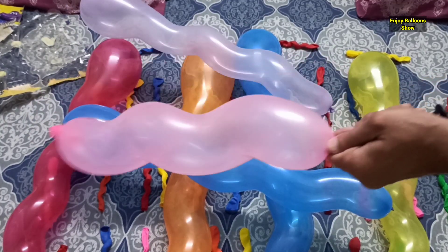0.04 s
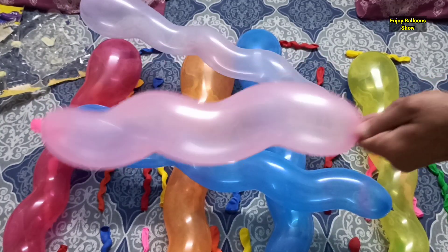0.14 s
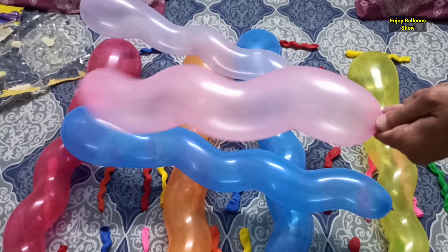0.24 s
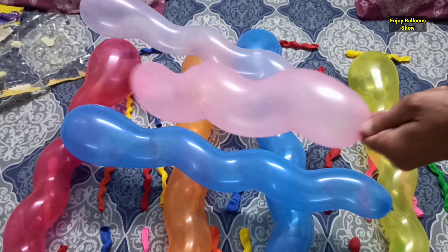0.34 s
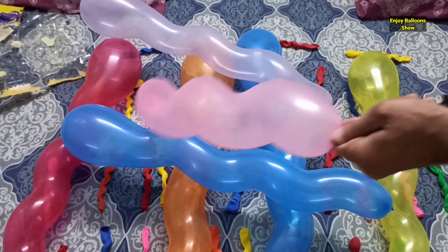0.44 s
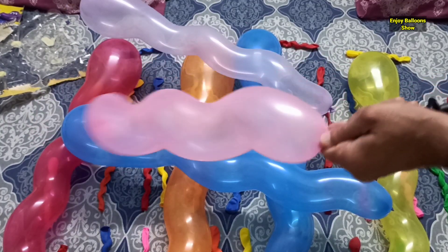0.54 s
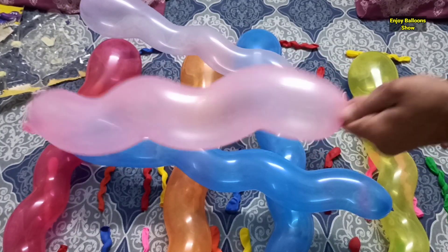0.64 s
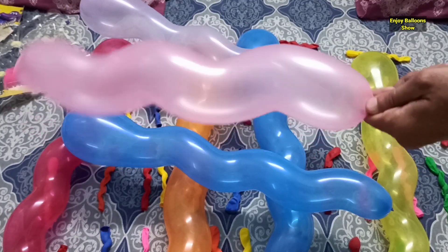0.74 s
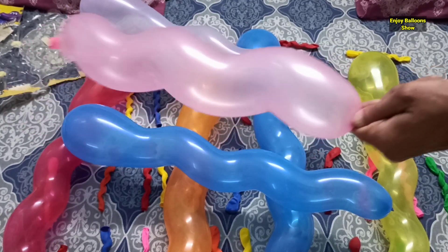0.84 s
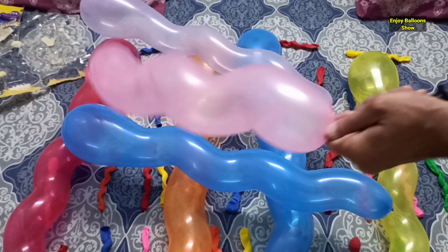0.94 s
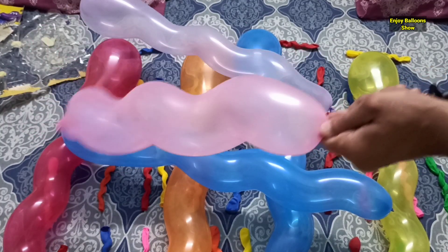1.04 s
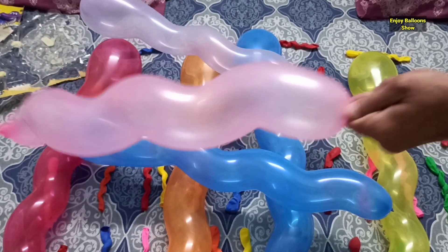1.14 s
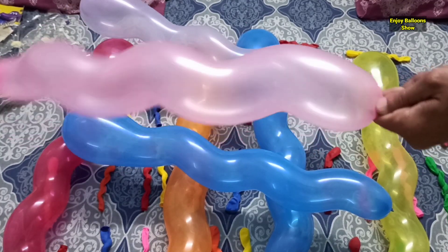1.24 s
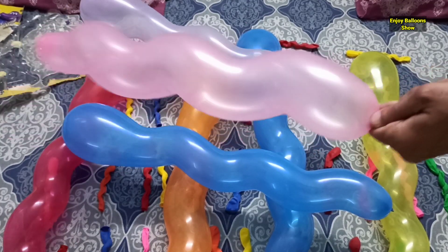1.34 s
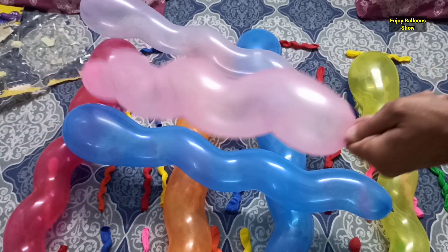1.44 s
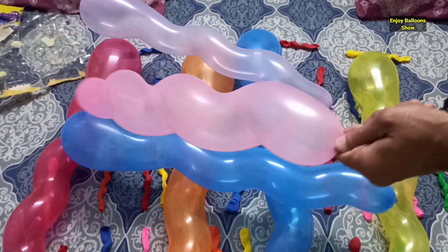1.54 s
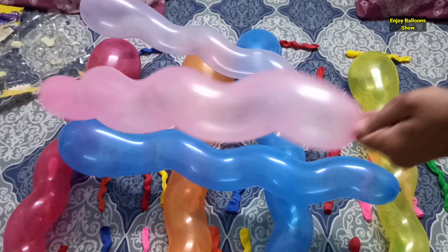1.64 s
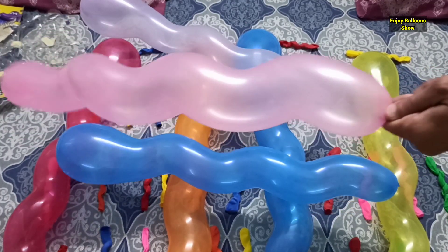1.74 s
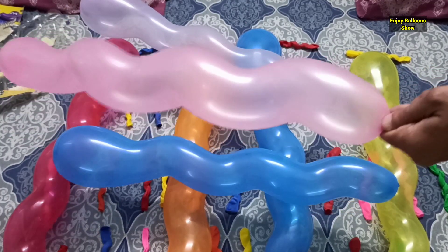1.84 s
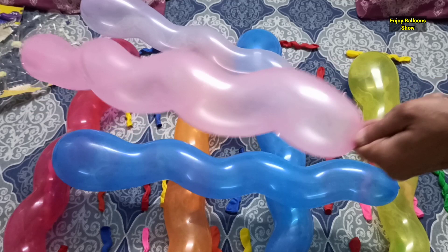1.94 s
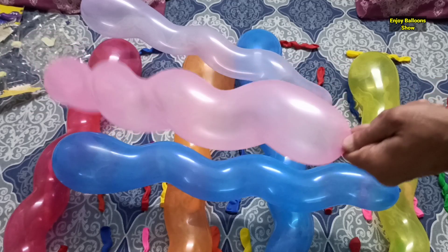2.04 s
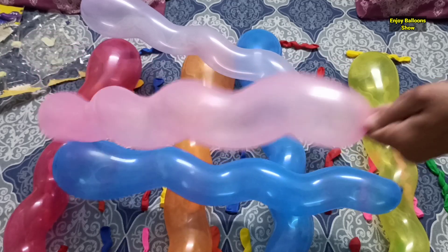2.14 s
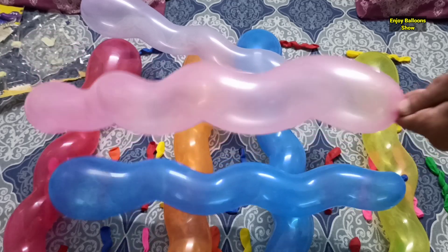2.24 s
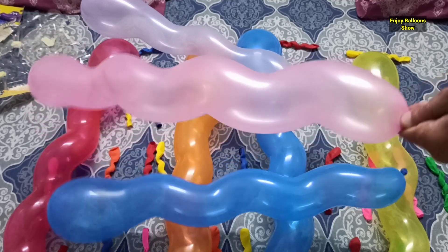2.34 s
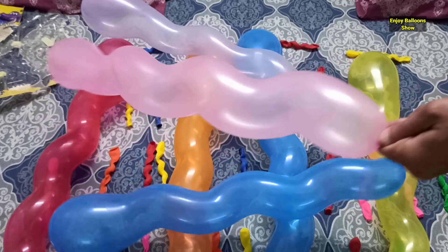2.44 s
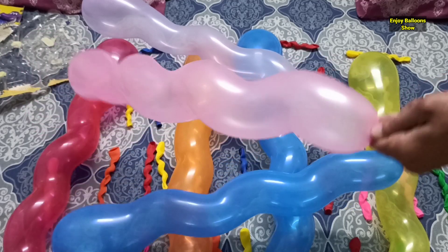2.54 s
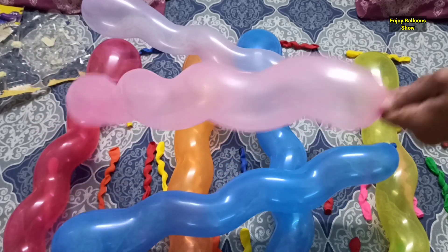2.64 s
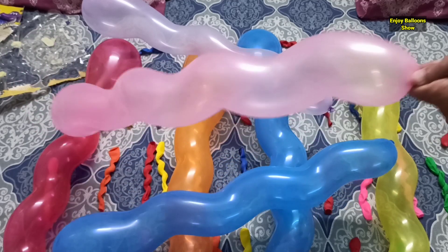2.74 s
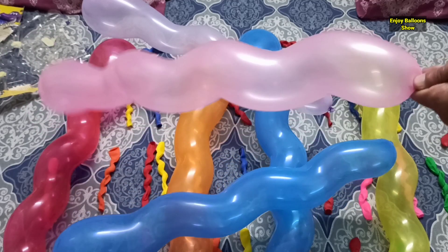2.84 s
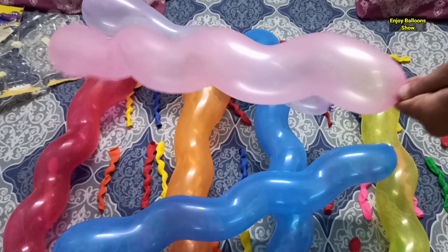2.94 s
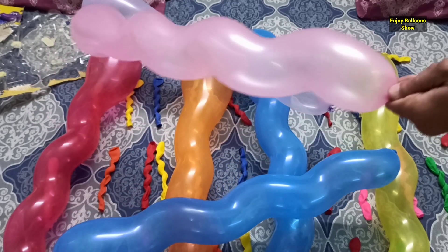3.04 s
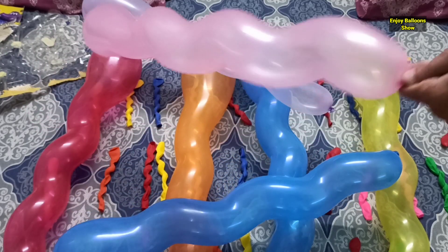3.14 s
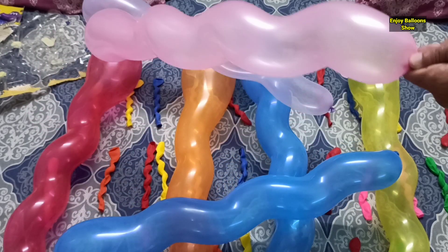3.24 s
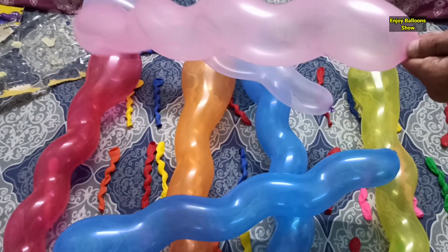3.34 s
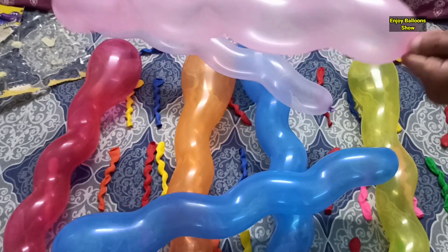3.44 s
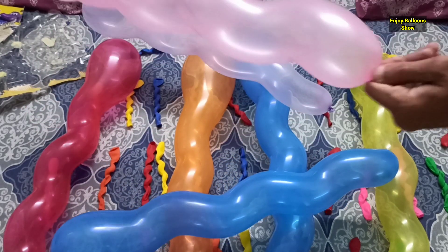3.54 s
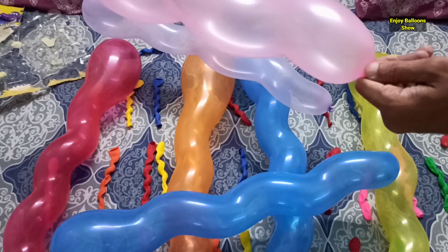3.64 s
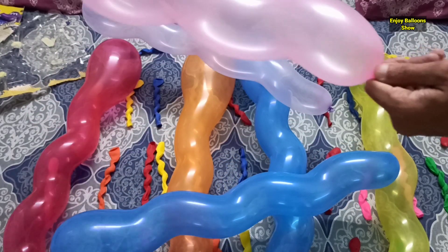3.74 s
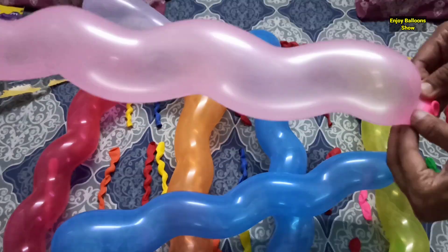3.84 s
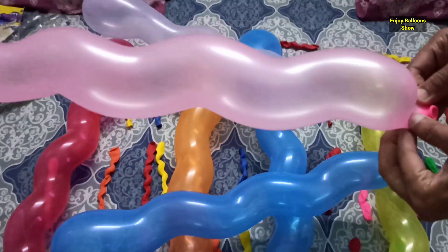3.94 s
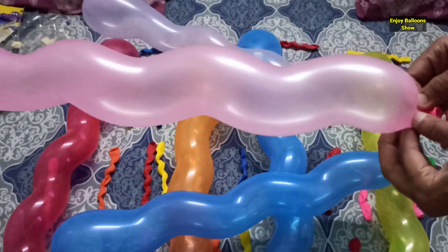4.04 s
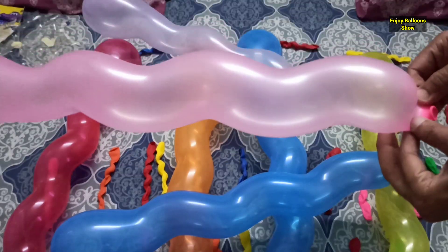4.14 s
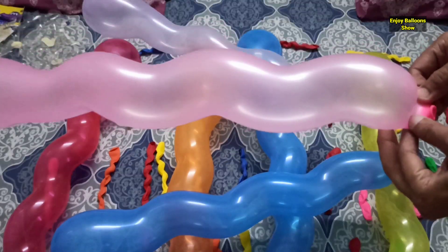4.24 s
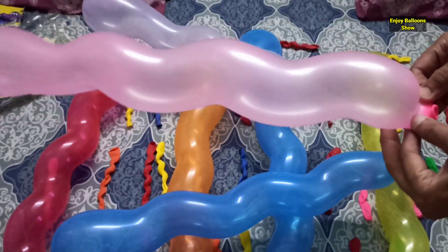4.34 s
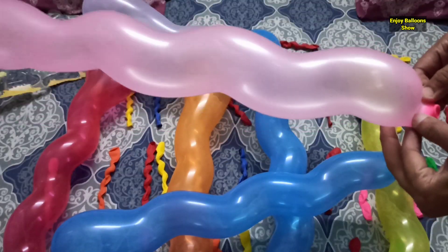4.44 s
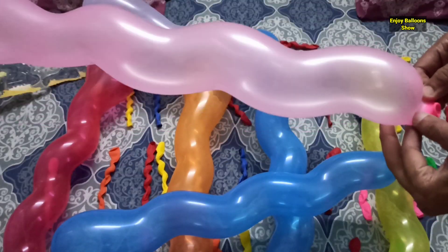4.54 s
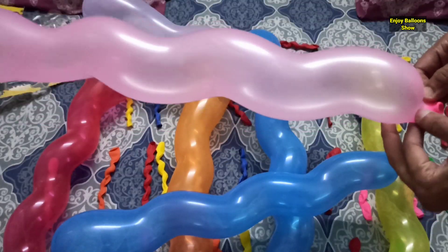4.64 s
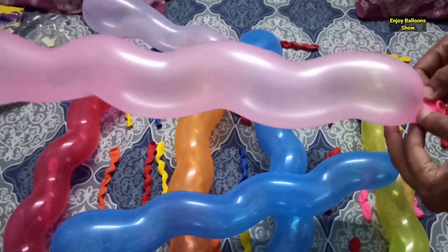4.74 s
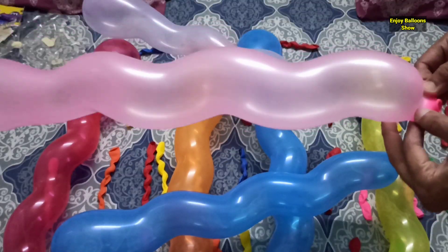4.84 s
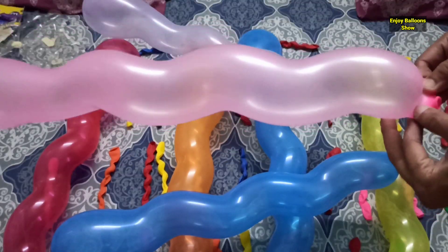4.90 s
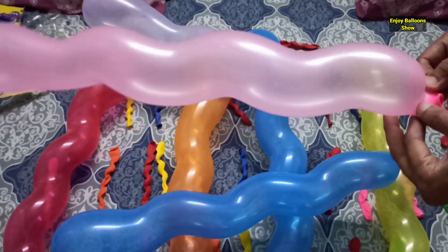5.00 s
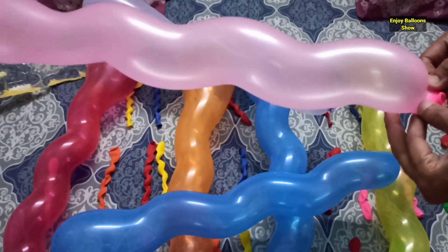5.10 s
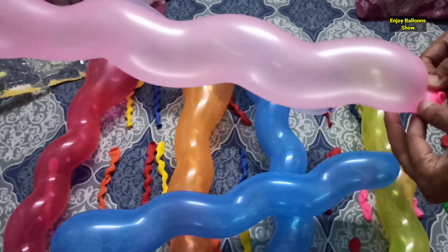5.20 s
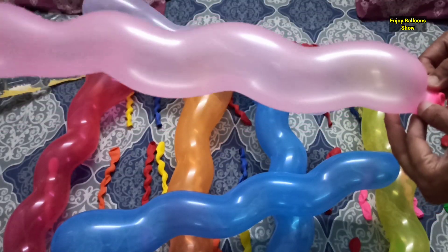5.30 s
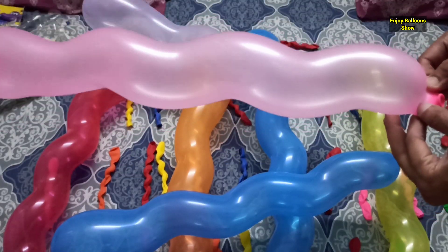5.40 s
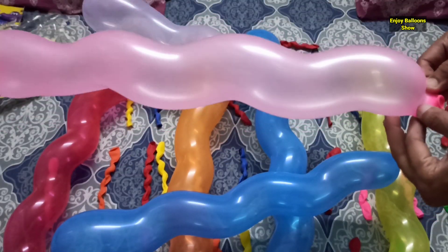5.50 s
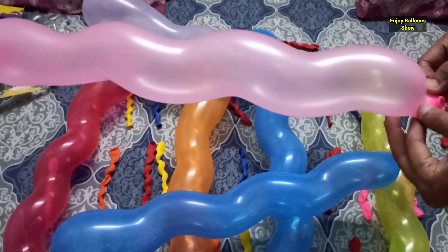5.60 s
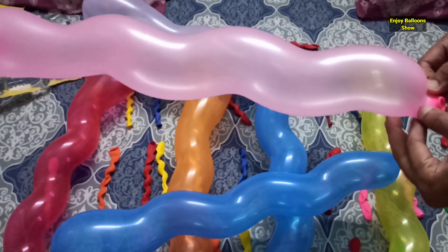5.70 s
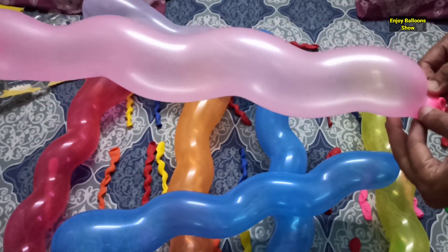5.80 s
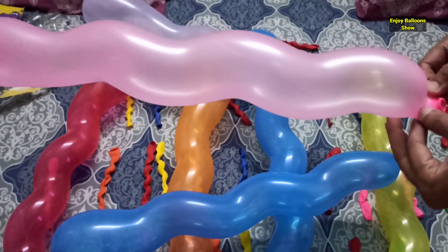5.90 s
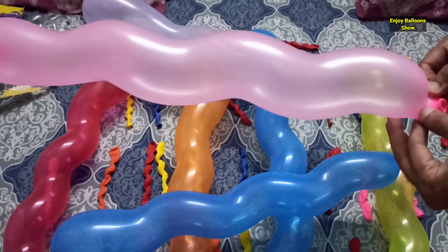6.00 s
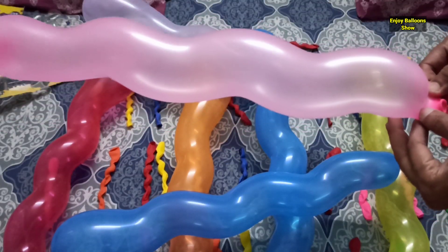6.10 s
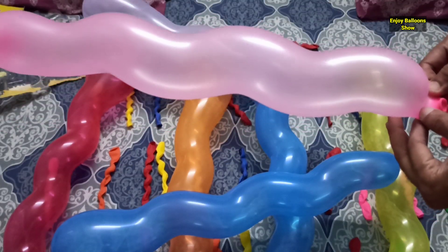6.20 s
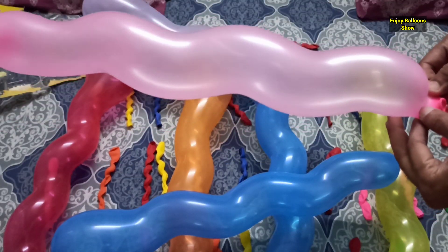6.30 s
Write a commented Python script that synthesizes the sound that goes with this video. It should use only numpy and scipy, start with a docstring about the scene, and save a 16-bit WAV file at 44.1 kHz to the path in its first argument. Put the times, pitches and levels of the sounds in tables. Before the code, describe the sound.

In a small, hard-walled room with a low fan hum, a plastic hand pump hisses, whistles and knocks seven times as it inflates a balloon, while a far horn toots faintly twice. A brief squeak and a puff of air follow as the balloon comes off. Its stretched neck then lets out a loud, close, high squeal that wavers, jumps in pitch and turns raspy.

```python
"""A hand pump hisses and knocks: seven strokes fill a long latex balloon, each push whistling in the valve.
The neck sticks and slips off the nozzle with a squeak and a puff. Stretched between the fingers, it flaps
in the escaping air: a loud, increasingly rough squeal, one slap of the rubber lips per cycle.
The room is small and hard. A fan hums throughout; a faint far horn toots twice."""
import sys
import numpy as np
from scipy import signal
from scipy.fft import rfft, irfft, next_fast_len
from scipy.io import wavfile
from scipy.ndimage import uniform_filter1d, map_coordinates

SR = 44100
rng = np.random.default_rng(int(sys.argv[2]) if len(sys.argv) > 2 else 0)


def wrap_up_sound(samples):
    """Save the sound to the file named by the first command line argument, as 16-bit audio."""
    columns = np.atleast_2d(samples).T
    # keep every value between -1 and 1, then stretch to whole-number steps
    tamed = np.clip(columns, -1, 1)
    steps = np.round(tamed * 32767).astype(np.int16)
    wavfile.write(sys.argv[1], SR, steps)


N = 280476
TIME_S = np.arange(N) / SR

# Table levels are relative, ahead of trims and mix gains.
# flap rate, rising as the fingers pull, falling as the rubber relaxes (time [s], rate [Hz])
FLAP_RATE_HZ = [(3.93, 1148), (3.98, 1200), (4.04, 1286), (4.132, 1275), (4.141, 1670), (4.154, 1472),
                (4.205, 1269), (4.265, 1142), (4.34, 1092), (4.46, 1053), (4.615, 1048), (4.68, 1164),
                (4.735, 1360), (4.75, 1569), (4.78, 1799), (4.802, 1612), (4.835, 1239), (4.865, 1062),
                (4.9, 1041), (4.93, 1105), (4.96, 1060), (5.05, 1128), (5.2, 1078), (5.4, 1045),
                (5.85, 1071), (6.1, 1057), (6.24, 1085), (6.36, 1082)]
# raggedness of the flapping (time [s], roughness [0-1])
FLAP_ROUGHNESS = [(3.95, 0.26), (4.17, 0.18), (4.3, 0.36), (4.63, 0.48), (4.71, .36), (4.85, 0.48),
                  (4.92, 0.83), (5.3, 0.93), (6.36, 0.91)]
# flapping breaks up (start [s], end [s], added limp [0-1], added roughness [0-1], added fundamental [0-1])
FLAP_BREAKS = [(4.048, 4.143, 0.33, 0.66, 0.05), (4.206, 4.257, 0.73, 0.25, 0),
               (4.738, 4.8, 0.1, 0.36, 0.42), (4.905, 4.962, 0.13, .35, 0.05)]
# first leak, swelling and pinched off (time [s], level [dB])
LEAK_DB = [(3.89, -60), (3.97, -23.5), (4.034, -17), (4.132, -27.5)]
# lip slap spectrum (frequency [Hz], level [dB])
SLAP_SPECTRUM_DB = [(1050, -8.5), (1600, -6.5), (2100, -8), (2600, -4), (3200, -4.5), (4250, -2.5),
                    (5300, -1.5), (6100, -3), (6700, 8), (7100, 2.5), (7550, 4), (8000, -6), (8400, -1),
                    (11800, -3.5), (15500, -11.5)]
# rushing air, plus a 10.5 kHz lift that partly offsets the microphone notch (frequency [Hz], level [dB])
RUSH_SPECTRUM_DB = [(40, -4), (150, -3.5), (700, -4.5), (1500, -1), (2100, -2.5), (2750, -3), (4200, 12),
                    (5300, -1.5), (6700, 11), (8400, 4.5), (10500, 13.5), (12000, -12), (15500, 5.5)]
# peaks and valleys in the neck's ring (centre [Hz], width [Hz], gain [dB])
NECK_RESONANCES = [(2930, 170, -4), (3450, 260, 3), (4250, 150, 1), (4980, 220, -3), (7020, 170, -4.5),
                   (7480, 150, 2), (7900, 170, -3), (8300, 170, 3.5)]
# squeal balance (frequency [Hz], left minus right [dB])
NECK_BALANCE_DB = [(60, -7), (110, -14), (200, -10.5), (380, -10), (700, -2), (1290, 3.5), (2380, 0),
                   (4400, -1), (8120, 0), (15000, 2)]
# squeal arrival on the left (frequency [Hz], delay [ms])
NECK_LAG_MS = [(1060, .35), (2120, .45), (3220, .445), (5330, .38), (7480, .306), (8350, .3), (15000, .232)]

# pump strokes (intake [dB], spurt time [s], spurt level [dB], push start [s], length [s], hiss [dB])
PUMP_STROKES = [(-45, .1, -39, 0.15, 0.122, -36.3), (-45, 0.613, -39.5, 0.6636, 0.12, -35.3),
                (-46, 1.103, -44, 1.162, 0.108, -33.3), (-46, 1.624, -45, 1.675, 0.104, -35),
                (-45, 1.9, -34.5, 2.166, 0.1, -33.5), (-47.5, 2.613, -38.5, 2.684, 0.119, -36),
                (-51.5, 3.115, -44, 3.172, 0.066, -38.5)]
# air escaping as the neck leaves the nozzle (start [s], end [s], level [dB])
NOZZLE_PUFFS = [(3.457, 3.495, -45), (3.491, 3.507, -21.5)]
# pump air spectra: push, intake, spurts (frequency [Hz], level [dB])
PUSH_SPECTRUM_DB = [(60, -26), (300, 7), (700, 5), (1300, -1.5), (2200, -2.5), (3800, 7.3), (5500, 5),
                    (8400, 7), (12000, -2), (15500, 6.5)]
DRAW_SPECTRUM_DB = [(100, -22), (700, 1.5), (2000, -1), (3800, 7), (5500, 3.5), (8400, -2.5), (12000, -8.5),
                    (15500, 1.5)]
SPURT_SPECTRUM_DB = [(100, -10), (600, 2), (1200, -3.5), (2000, 3.5), (4000, 9), (7500, 7.5), (12000, 3),
                     (15500, 6)]
# valve whistles (start [s], end [s], end level [dB], swell [dB], top pitch [Hz], end pitch [Hz])
VALVE_WHISTLES = [(0.15, 0.268, -34, 10, 9250, 8300), (0.663, 0.778, -34.5, 8, 9400, 7900),
                  (1.161, 1.268, -35.5, 0, 8950, 8200), (1.68, 1.786, -38, 5, 9350, 8150),
                  (2.166, 2.28, -35.5, 9, 9400, 8050), (2.679, 2.784, -35.5, 5, 9050, 8350),
                  (3.16, 3.222, -30, 10, 8600, 8500)]
# piston blows (time [s], level [dB])
PISTON_KNOCKS = [(0.1074, -25.5), (.339, -39), (.429, -36.5), (0.62, -23), (.836, -39.5), (.928, -41),
                 (1.111, -38), (1.63, -38), (1.955, -38), (2.123, -22), (2.621, -31), (3.121, -40)]
# pump barrel modes (frequency [Hz], level [dB], T60 [s])
BARREL_MODES = [(251, -3.5, 0.048), (365, 3, 0.036), (450, 2.5, 0.014)]
# nozzle squeak spectrum (frequency [Hz], level [dB])
SQUEAK_SPECTRUM_DB = [(2500, 3.5), (5200, -6), (7800, -13.5), (10400, -2), (15000, -21)]
# rubber rubs between pushes (start [s], end [s], rate [Hz], level [dB])
RUBBER_RUBS = [(0.424, 0.542, 260, -38), (0.765, 0.813, 235, -46), (0.914, .975, 255, -45),
               (1.11, 1.158, 225, -44), (1.933, 1.991, 290, -43), (2.365, 2.465, 235, -46)]

# fan air spectrum (frequency [Hz], level [dB])
FAN_SPECTRUM_DB = [(20, -11), (48, -4), (80, 1.5), (130, 4), (190, -0.5), (250, 2.5), (420, -5), (700, -9),
                   (1200, -18.5), (3000, -21), (5000, -20.5), (8000, -24), (15500, -27.5)]
# motor hum partials (frequency [Hz], level [dB])
HUM_PARTIALS = [(118.4, -1), (233, -9)]
# hum envelope, wavering and fading (time [s], level [dB])
HUM_ENVELOPE_DB = [(0, -41.5), (.34, -43), (.38, -51), (.48, -44), (.88, -44), (.98, -53), (1.11, -46),
                   (1.5, -53), (1.85, -45), (2.2, -46), (3.31, -49), (3.62, -45.5), (3.75, -53), (4.2, -49),
                   (6.36, -62)]
# horn toots (start [s], end [s], mid-toot level [dB])
HORN_TOOTS = [(1.426, 1.572, -45.5), (1.707, 1.915, -47.5)]
# horn spectrum (frequency [Hz], level [dB])
HORN_SPECTRUM_DB = [(326, 5.5), (650, -29), (1300, -8), (2600, -38), (3260, 3.5), (3600, -4), (4200, -14),
                    (8000, -50)]
# room decay (frequency [Hz], T60 [s])
ROOM_T60_S = [(150, 0.74), (500, 0.74), (2000, 0.31), (8000, 0.26), (15000, 0.17)]
# microphone response (frequency [Hz], gain [dB])
MIC_RESPONSE_DB = [(30, -23), (80, 0.5), (4550, 0.5), (4850, -7), (5200, -3), (5950, -1), (6250, 3),
                   (8450, 7.5), (8650, 0), (9400, -7), (9900, -21.5), (11450, -35.5), (11650, 4),
                   (15500, 1)]


def neck_squeal(shudder_hz=105.26, throb_hz=14, scatter_cycles=0.0079, flutter_db=4.5, highpass_hz=800):
    """The rubber lips slap shut once a cycle, never quite evenly, and chop the rushing air."""
    pitch_hz, roughness, limp, yelp = neck_motion()
    active = TIME_S >= LEAK_DB[0][0]
    jitter = drift(230) + 0.42 * drift(22.3) + 0.6 * quiver(shudder_hz, width_hz=31)
    pitch_hz = pitch_hz * (1 + (0.004 + 0.035 * roughness) * jitter)
    slap_offset_cycles = scatter_cycles * roughness * drift(360)
    pitch_hz = pitch_hz + np.gradient(slap_offset_cycles) * SR
    phase = 2 * np.pi * np.cumsum(pitch_hz * active) / SR
    fundamental = (yelp + 0.1 * quiver(throb_hz, width_hz=3.9)) * np.cos(phase)
    # alternating strong and weak slaps add tones between the harmonics
    strength = (1 + limp * np.cos(phase / 2)) * from_db(flutter_db * drift(114))
    slaps = strength * (pulses(pitch_hz, SLAP_SPECTRUM_DB, active, harmonics=15) + fundamental)
    # so small an opening radiates little below its own pitch
    slaps = signal.sosfilt(signal.butter(4, highpass_hz, "high", fs=SR, output="sos"), slaps)
    rush_gain = from_db(-12.5 + 10.5 * roughness)
    rush = rush_gain * noise(RUSH_SPECTRUM_DB) * (1 + 0.5 * np.cos(phase)) * active
    squeal = neck_flow() * (slaps + rush) / np.sqrt(1 + rush_gain ** 2)
    return resonant(squeal, NECK_RESONANCES)


def neck_motion(clearing_hz_per_s=2300):
    """Flapping runs cleaner as the rubber relaxes; in breaks it limps (uneven slaps) or yelps."""
    pitch_hz = curve(FLAP_RATE_HZ)
    fall_hz_per_s = np.maximum(-np.gradient(pitch_hz) * SR, 0)
    roughness = curve(FLAP_ROUGHNESS) / (1 + (fall_hz_per_s / clearing_hz_per_s) ** 2)
    limp, yelp = 0.093, 0
    for start_s, end_s, added_limp, added_roughness, added_fundamental in FLAP_BREAKS:
        broken = gate(start_s, end_s, edge_s=0.0082)
        roughness += added_roughness * broken
        limp += added_limp * broken
        yelp += added_fundamental * broken
    return pitch_hz, roughness, limp, yelp


def neck_flow(open_s=4.143, edge_s=0.0029):
    """Air through the neck: a first leak, then the full stream."""
    opened = (1 + np.tanh((TIME_S - open_s) / edge_s)) / 2
    return (1 - opened) * from_db(curve(LEAK_DB) - 0.5) + opened * from_db(-13.5)


def pump_air(draw_lead_s=0.25, draw_s=0.13, spurt_s=0.0096, release_s=0.018, spurt_edge_s=0.0038):
    """Each stroke has an intake hiss, a short spurt, a push hiss, a release spurt; the freed neck puffs."""
    push = draw = 0
    spurt = sum(from_db(db) * gate(start_s, end_s, spurt_edge_s) for start_s, end_s, db in NOZZLE_PUFFS)
    for draw_db, spurt_at_s, spurt_db, push_at_s, push_s, push_db in PUMP_STROKES:
        fade_db = 2 * np.clip((TIME_S - push_at_s) / push_s - 0.5, -1, 1)
        push += from_db(push_db - fade_db) * gate(push_at_s, push_at_s + push_s, edge_s=0.0083)
        draw_at_s = push_at_s - draw_lead_s
        draw += from_db(draw_db) * gate(draw_at_s, draw_at_s + draw_s, edge_s=0.02)
        spurt += from_db(spurt_db) * gate(spurt_at_s, spurt_at_s + spurt_s, spurt_edge_s)
        release_at_s = push_at_s + push_s + 0.059
        spurt += from_db(-43.5) * gate(release_at_s, release_at_s + release_s, spurt_edge_s)
    air = push * noise(PUSH_SPECTRUM_DB) + draw * noise(DRAW_SPECTRUM_DB)
    air += spurt * noise(SPURT_SPECTRUM_DB)
    return air * from_db(1.87 * drift(90))


def valve_whistle(climb_hz=2175, climb_s=0.013, catch_db=10, catch_s=0.027, edge_s=0.006, trim_db=-2.5):
    """Valve pitch arches with piston speed; the tone takes a moment to catch, clearest as the push slows."""
    pitch_hz, level = np.full(N, float(VALVE_WHISTLES[0][4])), 0
    peak_progress = 0.35
    for start_s, end_s, end_db, swell_db, top_hz, end_hz in VALVE_WHISTLES:
        age_s = np.clip(TIME_S - start_s, 0, end_s - start_s)
        progress = age_s / (end_s - start_s)
        from_peak = np.abs((progress - peak_progress) / (1 - peak_progress))
        arch_hz = top_hz - (top_hz - end_hz) * from_peak ** 1.3 - climb_hz * np.exp(-age_s / climb_s)
        pitch_hz = np.where(TIME_S > start_s - 5 * edge_s, arch_hz, pitch_hz)
        weaker_db = swell_db * (1 - progress) + catch_db * np.exp(-age_s / catch_s)
        level += from_db(trim_db + end_db - weaker_db) * gate(start_s, end_s, edge_s)
    phase = 2 * np.pi * np.cumsum(pitch_hz * (1 + 0.019 * drift(400))) / SR
    return np.sqrt(2) * level * from_db(3 * drift(53)) * np.sin(phase)


def piston_knocks(band_hz=(130, 900)):
    """Each padded piston blow rings the plastic barrel for a few cycles."""
    blows, age_s = np.zeros(N), TIME_S[:SR // 4]
    for at_s, db in PISTON_KNOCKS:
        blows[round(at_s * SR)] = from_db(db)
    ring = sum(from_db(db - 60 * age_s / t60_s) * np.sin(2 * np.pi * hz * age_s)
               for hz, db, t60_s in BARREL_MODES)
    knocks = signal.oaconvolve(blows, ring)[:N]
    return signal.sosfilt(signal.butter(2, band_hz, "band", fs=SR, output="sos"), knocks)


def nozzle_squeak(start_s=3.383, top_s=3.414, end_s=3.488, top_hz=2610, sag_hz=125):
    """Rubber sticks and slips off the nozzle; the pitch arches."""
    arch = np.clip(2 * (TIME_S - top_s) / (end_s - start_s), -2, 2) ** 2
    pitch_hz = (top_hz - sag_hz * arch) * (1 + 0.008 * drift(140))
    level = gate(start_s, end_s, edge_s=0.003)
    return from_db(-38) * level * pulses(pitch_hz, SQUEAK_SPECTRUM_DB, level > 0.001, harmonics=6)


def rubber_rubs(waver=0.0606, flutter_db=3):
    """Rubber sticks and slips at a low, uneven rate."""
    warped_s = np.cumsum(1 + waver * drift(60)) / SR
    rubs = sum(from_db(db) * gate(start_s, end_s, edge_s=0.008) * np.sin(2 * np.pi * hz * warped_s)
               for start_s, end_s, hz, db in RUBBER_RUBS)
    return rubs * from_db(flutter_db * drift(35))


def fan(side_db=-8, waver=0.01785, flutter_db=2.3):
    """Low stereo air noise and a wavering motor hum."""
    air = noise(FAN_SPECTRUM_DB) + from_db(side_db) * noise(FAN_SPECTRUM_DB) * [[1], [-1]]
    warped_s = np.cumsum(1 + waver * drift(10.3)) / SR
    hum = sum(np.sqrt(2) * from_db(db + flutter_db * drift(5.5)) * np.sin(2 * np.pi * hz * warped_s)
              for hz, db in HUM_PARTIALS)
    return from_db(-45) * air + from_db(curve(HUM_ENVELOPE_DB) - 1) * hum


def far_horn(note_hz=326.4, fade_db_per_s=25, flutter_db=2.5):
    """Faint buzzing note with a bright resonance; each toot fades unevenly."""
    level = 0
    for start_s, end_s, db in HORN_TOOTS:
        from_middle_s = np.clip(TIME_S, start_s, end_s) - (start_s + end_s) / 2
        level += from_db(db - fade_db_per_s * from_middle_s) * gate(start_s, end_s, edge_s=0.017)
    flutter = from_db(flutter_db * drift(25))
    pitch_hz = note_hz * (1 + 0.0035 * drift(30))
    return level * flutter * pulses(pitch_hz, HORN_SPECTRUM_DB, level > 1e-5, harmonics=13)


def room(x, wet_db, lag_ms, sway_ms, pan_db, t60_scale=1):
    """Direct sound, its left lag swaying with the hand, plus dense reflections that differ by side."""
    age_s = TIME_S[:SR // 2]
    white = rfft(rng.standard_normal((2, len(age_s))))
    hz, edges_hz = bins_hz(len(age_s)), np.geomspace(20, SR / 2, num=11)
    tail = 0
    for low_hz, high_hz in zip(edges_hz, edges_hz[1:]):
        t60_s = t60_scale * at_hz(ROOM_T60_S, np.sqrt(low_hz * high_hz))
        decay = from_db(-60 * age_s / t60_s) * (age_s > 0.003)
        band = irfft(white * ((hz >= low_hz) & (hz < high_hz)), len(age_s))
        tail += band * decay / np.sqrt(np.sum(decay ** 2))
    lag_samples = (lag_ms + sway_ms * drift(3)) * SR / 1000
    left = map_coordinates(x, [np.arange(N) - lag_samples], order=3)
    direct = np.array([left, x]) * from_db([[pan_db / 2], [-pan_db / 2]])
    reflections = signal.oaconvolve(x[None], tail, axes=1)[:, :N]
    wet = from_db(wet_db)
    return (direct + wet * reflections) / np.sqrt(1 + wet ** 2)


def spectral_pan(x, balance_db, lag_ms):
    """Per-frequency balance and left delay."""
    size = next_fast_len(N + SR // 2, True)
    hz = bins_hz(size)
    delay = np.exp(-2j * np.pi * hz * at_hz(lag_ms, hz) / 1000)
    left = irfft(rfft(x[0], size) * delay, size)[:N]
    return np.array([shaped(side, [(f_hz, sign * db / 2) for f_hz, db in balance_db])
                     for side, sign in ((left, 1), (x[1], -1))])


def limiter(x, ceiling_db=-13.5, window_s=0.0035):
    """Gain drops while short-term power exceeds the ceiling."""
    power = uniform_filter1d(np.mean(x ** 2, axis=0), round(window_s * SR))
    return x / np.sqrt(np.maximum(power / from_db(ceiling_db) ** 2, 1))


def pulses(pitch_hz, spectrum_db, active, harmonics, smear_rad=0.306):
    """One pulse a cycle, smeared by the body it rings; unit power while active."""
    hz, train = pitch_hz[active], np.zeros(N)
    phase = 2 * np.pi * np.cumsum(hz) / SR
    partials = (from_db(at_hz(spectrum_db, k * hz)) * (k * hz < SR / 2)
                * np.cos(k * phase - smear_rad * k ** 2) for k in range(1, harmonics + 1))
    train[active] = rms_one(sum(partials))
    return train


def noise(spectrum_db):
    """Coloured noise, unit power."""
    return rms_one(shaped(rng.standard_normal(N), spectrum_db))


def drift(rate_hz):
    """Smooth random motion, unit RMS."""
    step, run_in = 8, 4000
    pole = np.exp(-2 * np.pi * rate_hz * step / SR)
    white = rng.standard_normal(N // step + run_in + 2)
    slow = signal.lfilter([1], [1, -2 * pole, pole * pole], white)[run_in:]
    return np.interp(np.arange(N) / step, np.arange(len(slow)), rms_one(slow))


def quiver(hz, width_hz):
    """Narrowband random oscillation, unit RMS."""
    phase = 2 * np.pi * hz * TIME_S
    return drift(width_hz) * np.cos(phase) + drift(width_hz) * np.sin(phase)


def gate(start_s, end_s, edge_s):
    """Smooth on/off window."""
    window = np.zeros(N)
    near = slice(*np.searchsorted(TIME_S, [start_s - 10 * edge_s, end_s + 10 * edge_s]))
    near_s = TIME_S[near]
    window[near] = (np.tanh((near_s - start_s) / edge_s) - np.tanh((near_s - end_s) / edge_s)) / 2
    return window


def resonant(x, resonances):
    """Filter by bell-shaped peaks and valleys."""
    hz = np.linspace(1, SR / 2, num=600)
    gain_db = sum(db * np.exp(-((hz - mid_hz) / width_hz) ** 2) for mid_hz, width_hz, db in resonances)
    return shaped(x, np.transpose([hz, gain_db]))


def shaped(x, spectrum_db):
    """Zero-phase filter."""
    size = next_fast_len(N + SR // 2, True)
    return irfft(rfft(x, size) * from_db(at_hz(spectrum_db, bins_hz(size))), size)[..., :N]


def curve(points):
    """Time curve at every sample."""
    return np.interp(TIME_S, *np.transpose(points))


def at_hz(points, hz):
    """Interpolate over log frequency."""
    knots_hz, values = np.transpose(points)
    return np.interp(np.log(np.maximum(hz, 1)), np.log(knots_hz), values)


def bins_hz(size):
    return np.arange(size // 2 + 1) * SR / size


def from_db(db):
    return 10 ** (np.asarray(db) / 20)


def rms_one(x):
    return x / np.sqrt(np.mean(x ** 2) + 1e-20)


def scene():
    """Pump off to the right, balloon neck close in front, fan and horn behind."""
    pump = room(pump_air() + nozzle_squeak(), wet_db=1.5, lag_ms=0.1, sway_ms=0.048, pan_db=-2.5)
    # the whistle beams at the microphones: less room than the hiss
    pump += room(valve_whistle(), wet_db=-5, lag_ms=0.02, sway_ms=0.01, pan_db=-6)
    handling = room(piston_knocks() + rubber_rubs(), wet_db=-2, lag_ms=0.4, sway_ms=0.02, pan_db=-1.5)
    # close neck: mostly early reflections
    squeal = room(neck_squeal(), wet_db=-1.2, lag_ms=0, sway_ms=0, pan_db=0, t60_scale=0.75)
    squeal = spectral_pan(squeal, NECK_BALANCE_DB, NECK_LAG_MS)
    background = (fan() + far_horn()) * from_db([[-0.5], [0.5]])
    return squeal + from_db(4.5) * pump + from_db(1.5) * handling + background


def record(dry, cutoff_hz=15500):
    """Microphone colour, limiter, steep low-pass."""
    lowpass = signal.ellip(12, 0.2, 80, cutoff_hz, fs=SR, output="sos")
    return signal.sosfilt(lowpass, limiter(shaped(dry, MIC_RESPONSE_DB)))


dry = scene()
out = record(dry)
wrap_up_sound(out)
```